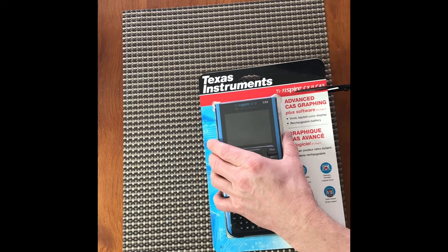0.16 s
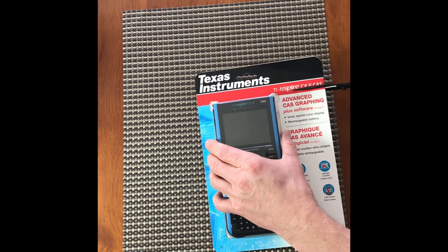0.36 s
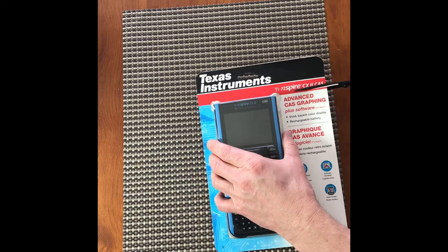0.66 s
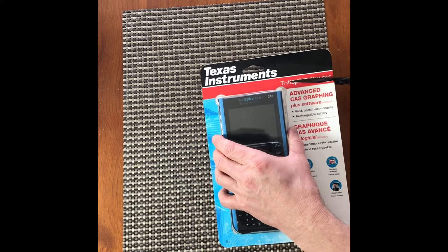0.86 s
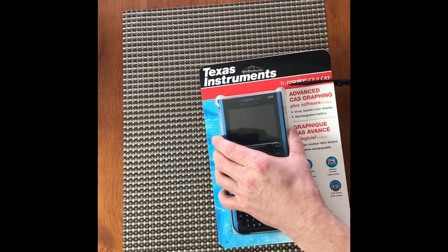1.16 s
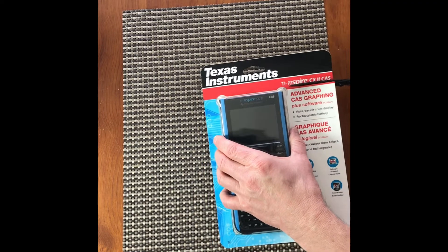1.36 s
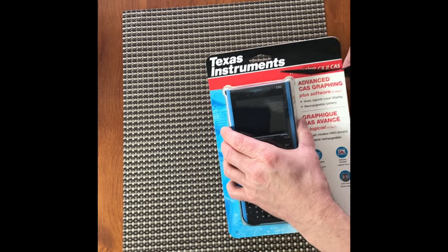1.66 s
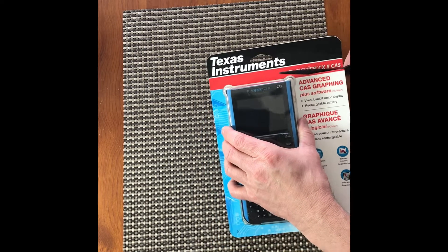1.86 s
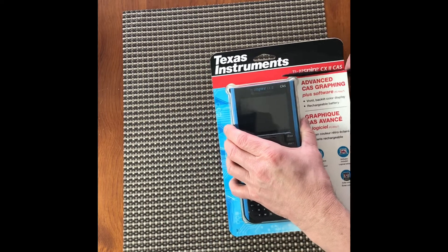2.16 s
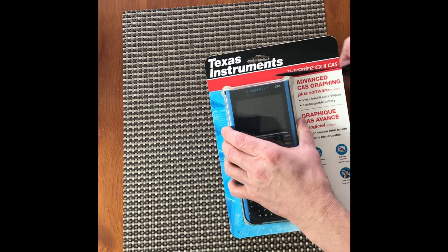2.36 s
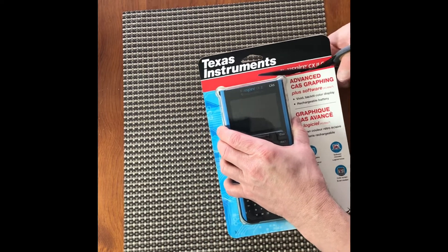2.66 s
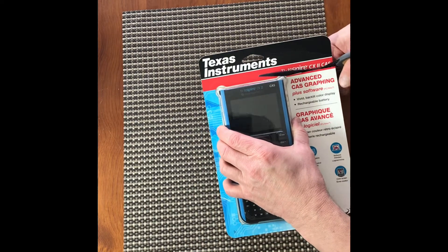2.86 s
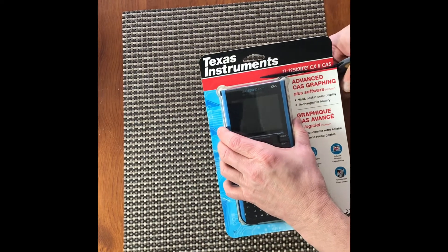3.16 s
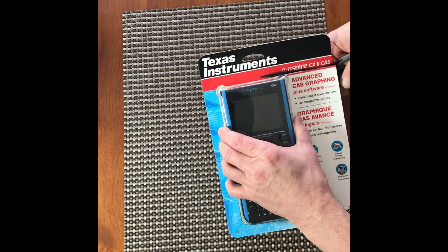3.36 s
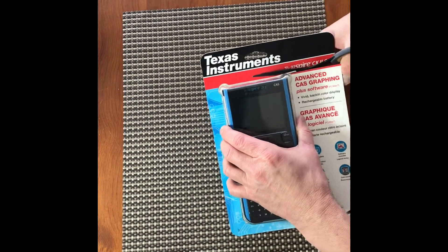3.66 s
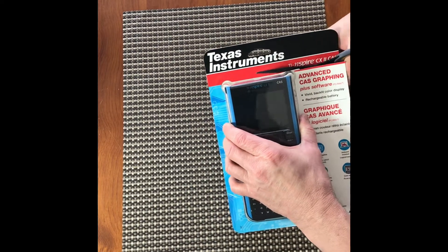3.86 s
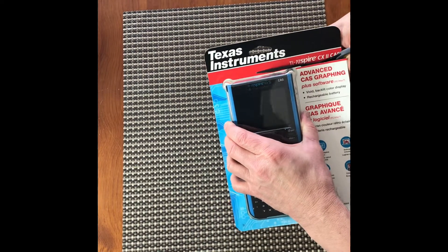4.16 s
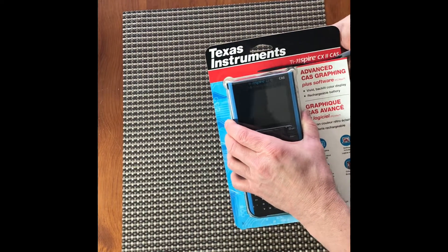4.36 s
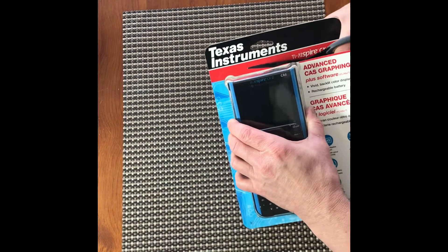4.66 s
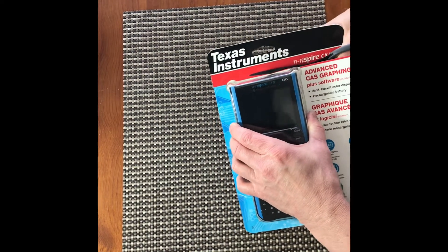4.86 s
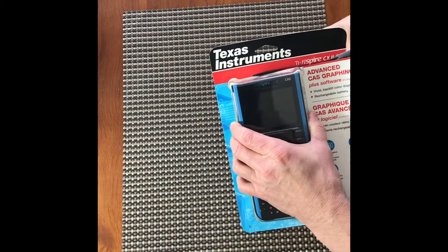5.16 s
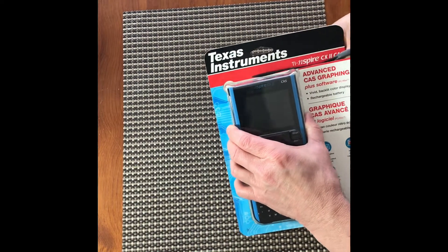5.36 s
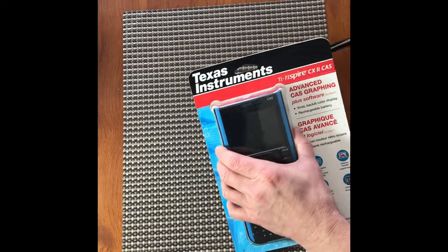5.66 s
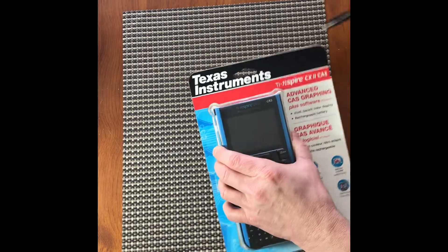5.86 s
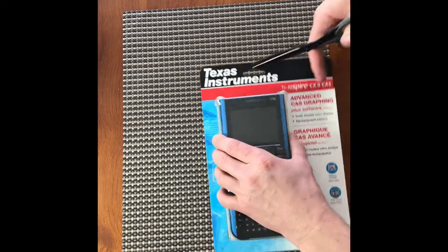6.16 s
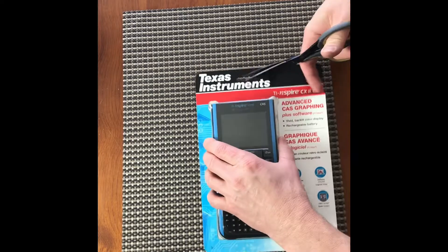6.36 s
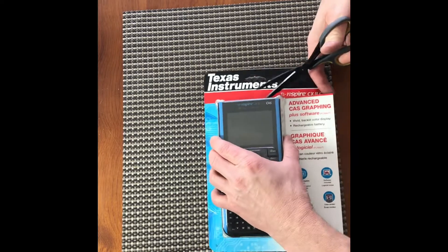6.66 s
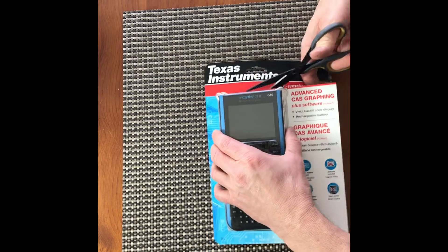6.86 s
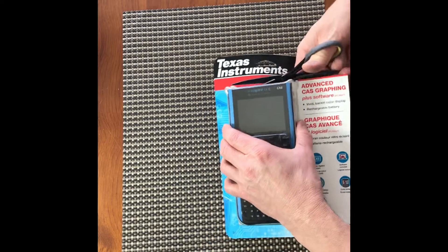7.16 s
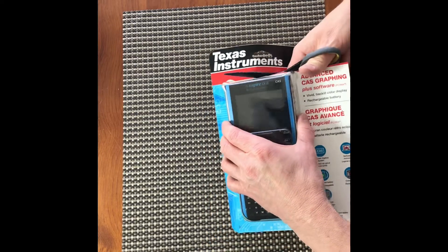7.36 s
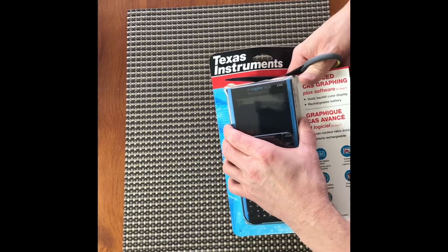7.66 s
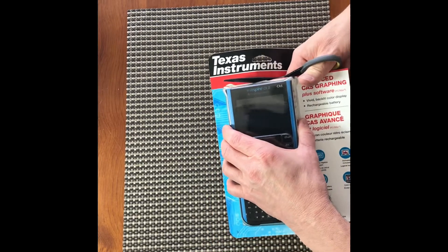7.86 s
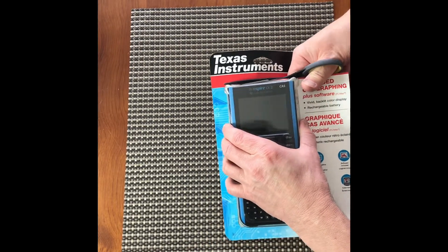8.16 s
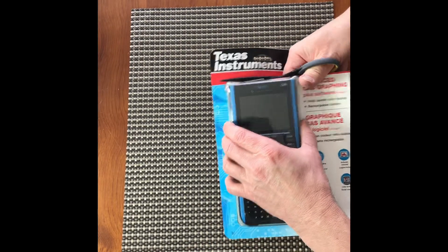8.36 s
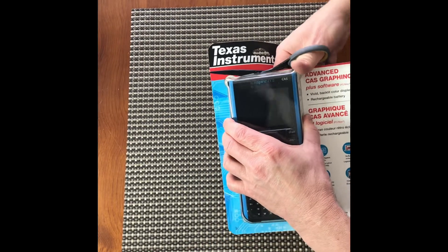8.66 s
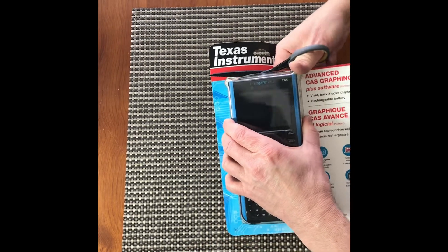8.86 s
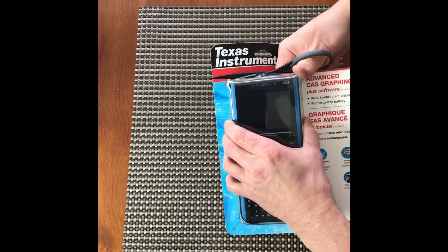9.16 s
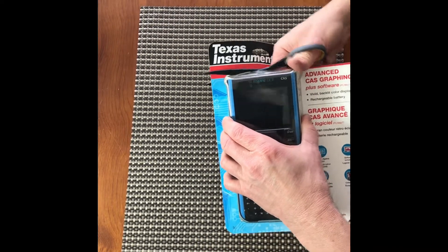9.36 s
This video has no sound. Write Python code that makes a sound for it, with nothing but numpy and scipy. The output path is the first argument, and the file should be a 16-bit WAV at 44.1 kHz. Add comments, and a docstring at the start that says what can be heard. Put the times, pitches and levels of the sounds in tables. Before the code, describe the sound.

Close by in a small room, scissors bite through a stiff plastic shell. Small crisp clicks come in uneven groups, with one hard crack near three seconds and another strong one just before six. Blades softly rub open between bites. Later the snaps crowd together over a faint hand rumble on the table, with short room echo and quiet low air.

```python
"""In a small room, scissors work through a stiff plastic blister pack held down by hand on a table mat.
Fracture: the sheet gives way in snaps, each a crumble of tiny clicks that excites modes of pack and blades.
Stick-slip friction: squeezes grind the blades along the cut; about once a second they rub open again.
Forced vibration: filtered noise with a table resonance gives the dull rumble of the pressing hand.
Decaying noise echoes the cutting, and steady coloured noise is the air of the room."""
import sys
import numpy as np
from scipy import signal
from scipy.fft import rfft, irfft, next_fast_len
from scipy.io import wavfile

SR = 44100
rng = np.random.default_rng(int(sys.argv[2]) if len(sys.argv) > 2 else 0)


def to_wav(sig):
    """Store sig (one row per channel, or 1-D mono) as 16-bit WAV at the path in sys.argv[1].

    Samples outside -1..1 are clipped; the rate is SR.
    """
    pcm = np.clip(np.atleast_2d(sig), -1, 1) * 32767
    pcm = np.round(pcm).astype(np.int16)
    wavfile.write(sys.argv[1], SR, pcm.T)  # frames by channels


N = 418509   # length in samples

# Spectrum of the still room: f/Hz, relative density/dB per Hz
AIR_SPECTRUM = [(15, -48.5), (25, -14), (64, -3.5), (141, -4.5), (293, -7.5), (354, -6), (476, -13.5),
                (734, -10), (1020, -20), (1370, -18.5), (2280, -25.5), (5880, -28), (16000, -38)]
# Snaps of the sheet: t/s, build-up/s, level/dB, shell flex/dB re level, sharpness/dB
SHEET_SNAPS = [(.095, 0.0046, -63.5, -2, -4.5), (.1482, 0.0018, -62.5, 0.5, -11),
               (.244, 0.0019, -48, -9, -18), (.264, 0.0025, -51, -4.5, -11.5),
               (.3914, 0.0029, -51, -5.5, -15.5), (.585, 0.0039, -50.5, -7.5, -14),
               (.824, 0.0019, -65.5, 4, -17), (1.057, 0.0072, -52, -16, -28.5),
               (1.1401, 0.0015, -47.5, -6, -14.5), (1.2311, 0.0017, -61.5, -14, -8),
               (1.2534, .0006, -58.5, -12, -11.5), (1.341, 0.0058, -48, -10, -12),
               (1.606, 0.0031, -53, -2, -13), (1.8771, 0.0061, -60.5, -11, -1),
               (1.9469, 0.0028, -46.5, -4.5, -17.5), (2.0569, 0.0042, -62, -5, -5),
               (2.3401, 0.0036, -59.5, -7, -14), (2.411, 0.0023, -52.5, -4.5, -22),
               (2.7847, .0008, -45.5, -10.5, -8.5), (2.8122, 0.0028, -59.5, 9, -15),
               (3.0034, .0005, -30.5, -2, -18), (3.2365, .002, -56.5, -9, -22),
               (3.5249, 0.0016, -61, -1.5, -22), (3.8145, .0011, -56.5, -7, -19),
               (4.0834, .002, -60, 8, -6.5), (4.1257, 0.00063, -47.5, 3, -18),
               (4.3099, 0.0037, -51, 6.5, -12.5), (4.349, 0.00037, -51.5, -3, -21),
               (4.6852, .0005, -71, 10.5, 5.5), (4.7202, 0.0054, -58, 7.5, -17),
               (4.8618, .003, -56, 6, -11.5), (4.9045, 0.00119, -38.5, 1, -27), (4.949, .0015, -56, -2, -8),
               (4.9691, 0.0022, -52, -18, -17), (5.0673, 0.0024, -44, 0, -22), (5.452, .001, -57, -6, -11),
               (5.4828, 0.0026, -45.5, 2, -27), (5.5579, 0.00096, -47.5, -3, -9.5),
               (5.5777, .0005, -52, 5, -25), (5.6188, .0004, -50.5, -5, -23),
               (5.7017, 0.0016, -44.5, -15, -27), (5.7401, .003, -35, 2.5, -8),
               (5.7878, 0.0014, -50, 5, -5.5), (6.2427, 0.0006, -62.5, 1, -13),
               (6.275, .001, -54.5, -12, -20), (6.3348, .0027, -58.5, 3, -10.5),
               (6.4248, 0.0018, -62, -12, -20), (6.5901, .00075, -56.5, 5.5, -12.5),
               (6.652, 0.00095, -57, -2, -13), (6.746, 0.0034, -51, 2.5, -21), (6.777, 0.0036, -55, 1, -16),
               (6.822, 0.0048, -55, 4.5, -10), (6.8981, .008, -52, 0.5, -17),
               (6.9427, 0.0015, -55.5, 1, -8), (7.1, 0.0055, -55, -1, -14), (7.2501, 0.0022, -52, 8, -3.5),
               (7.258, .0003, -52, 11.5, -32), (7.368, 0.0032, -52, 3, -19),
               (7.641, .0013, -62.5, -2, -16.5), (7.8864, 0.0069, -57.5, 6, -11),
               (8.003, .0017, -47.5, -4, -21), (8.0279, 0.0051, -48.5, 0, -13),
               (8.134, 0.00095, -60.5, 5.5, -31), (8.3529, 0.0016, -46.5, 1, -7),
               (8.3632, 0.00096, -54.5, 7, 6), (8.4796, .0028, -58, 2.5, -8.5),
               (8.9835, .0006, -43.5, 0.5, 3.5), (9.0367, 0.0019, -53.5, 9, -3),
               (9.2992, 0.0032, -57, 10.5, -13), (9.333, 0.0061, -45, 3, -26),
               (9.3805, 0.0019, -42, 0, -18)]
# Resonances of pack and blades: f/Hz, width/Hz, relative level/dB; only those inside a register sound
PACK_MODES = [(141, 38, -18), (215.4, 13.5, -9.5), (260.7, 53, -7.5), (351.6, 46, 3), (416, 74, -1),
              (534.8, 33, 5), (728, 90, 3.5), (794, 57, 4.5), (928, 31, -3), (1180, 120, -2),
              (1410, 130, -2.5), (1435, 790, 8.5), (1826, 130, 1), (2720, 210, -8), (3060, 1200, 3.5),
              (3725, 200, -7.5), (5070, 1500, -7), (5940, 1840, -1.5), (8330, 1100, -8.5),
              (13100, 4600, -10)]
# Registers of the modes, in the order flex, ring, crack, edge, tick, top:
# low f/Hz, high f/Hz, crumble time constant of an instant break/s, gain/dB, share of the sharpness
MODE_REGISTERS = [(119, 535, 0.0045, 1.63, 0.078), (590, 990, 0.003, 0.37, 0),
                  (1127, 1816, 0.0059, 2, 0.51), (2560, 4240, 0.0044, 0.98, .75),
                  (4800, 8100, 0.0055, -1.85, 0.97), (9000, 15100, 0.0046, -10.5, 0.89)]
# Decay of the room: f/Hz, t60/s
REVERBERATION_TIME = [(100, 0.32), (300, 0.53), (800, 0.54), (2000, 0.5), (5000, 0.39), (13000, 0.21)]
# Strength of the echo against the direct sound: f/Hz, level/dB
ECHO_LEVEL = [(100, 2), (350, -2), (800, -4.5), (1600, -3), (3200, -2), (7000, -4.5), (14000, -6.5)]
# Spectrum of the sliding friction: f/Hz, relative density/dB per Hz
FRICTION_SPECTRUM = [(88, -45.5), (150, -15), (222, -9.5), (334, -3.5), (439, -5), (637, -2), (805, -3.5),
                     (1060, -12.5), (1210, -9.5), (1900, -18), (2140, -28), (3220, -25.5), (4240, -28.5),
                     (14800, -46), (16000, -35)]
# Blades rubbing open for the next bite: middle t/s, half length/s, stroke level/dB
OPENING_STROKES = [(.145, .035, -60.5), (.82, 0.19, -63.5), (1.6, .085, -55), (2.4, 0.05, -53.5),
                   (3.44, 0.053, -54.5), (4.49, 0.042, -52.5), (5.45, 0.12, -54.5)]
# Squeezes grinding the blades through the sheet: middle t/s, half length/s, stroke level/dB
SQUEEZE_STROKES = [(0.286, .025, -51), (1.17, .15, -62), (1.904, .06, -56), (2.927, .075, -60),
                   (3.19, .04, -54.5), (3.78, 0.04, -57), (4.168, .07, -53), (4.96, .1, -53),
                   (5.711, .14, -51), (6.765, .03, -53), (6.871, .07, -54), (7.1, .3, -58.5),
                   (7.32, .06, -56.5), (7.658, .07, -59), (8.076, .13, -54), (8.498, .1, -57),
                   (8.913, .05, -56), (9.38, .12, -56)]
# The hand pressing and shifting the pack on the table: middle t/s, half length/s, rumble level/dB
HAND_PRESSES = [(3.638, 0.057, -63), (5.78, .1, -62), (6.39, 0.088, -59), (7.1, .35, -73),
                (8.08, 0.16, -60.5), (8.695, 0.53, -62.5), (9.4, .17, -60.5)]

AIR_DB = -65.5
# the first bites, in the taut rim, are the crispest
FIRST_BITES_S, FIRST_BITES_TOP_DB = 2.3, 6.5
# once the first cut breaks through, the open shell cracks louder
SECOND_CUT_S, SECOND_CUT_CRACK_DB = 5.72, 4
# a hard grip damps the modes under STIFF_HZ: dB per octave for each dB of snap over HARD_SNAP_DB
HARD_SNAP_DB, STIFF_HZ, STIFF_DB_PER_OCT = -47, 350, 1.1
# hiss before the stroke level is applied; bare steel is the brighter
SQUEEZE_HISS_DB, OPENING_HISS_DB = -9, -4.5
# crumbs: mean level against the squeeze, full range of levels, mean build-up
CRUMB_DB, CRUMB_SPREAD_DB, CRUMB_BUILD_S = -8, 2, .0015
CRUMB_FLEX_DB, CRUMB_SHARP_DB = -4.5, -17   # colour of the crumbs, as in SHEET_SNAPS
CUTOFF_HZ = 15800


def from_db(db):
    """Logarithmic levels: decibels to amplitude gain."""
    return 10 ** (np.asarray(db) / 20)


def rms_one(x):
    """Mean power: scale a signal to unit rms."""
    return x / np.sqrt(np.mean(x ** 2) + 1e-20)


def at_hz(points, hz):
    """Interpolation of a spectrum on a logarithmic frequency axis."""
    f, value = np.transpose(points)
    return np.interp(np.log(np.maximum(hz, 1)), np.log(f), value)


def band(x, low_hz, high_hz):
    """Band limitation by a Butterworth band-pass."""
    sos = signal.butter(2, [low_hz, high_hz], "band", fs=SR, output="sos")
    return signal.sosfilt(sos, x)


def colour(x, spectrum):
    """Spectral shaping: multiply the Fourier transform by a smooth gain."""
    size = next_fast_len(N)
    gain = from_db(at_hz(spectrum, np.fft.rfftfreq(size, 1 / SR)))
    return irfft(rfft(x, size) * gain, size)[:N]


def resonate(x, hz, width_hz):
    """Damped oscillator: a two-pole resonance with gain 1 at its peak."""
    r = np.exp(-np.pi * width_hz / SR)
    numerator = np.array([1, 0, -1]) * (1 - r * r) / 2
    denominator = [1, -2 * r * np.cos(2 * np.pi * hz / SR), r * r]
    return signal.lfilter(numerator, denominator, x + 1e-18)


def grains(shape, per_s, spread_db):
    """Shot noise: random tiny clicks of either sign and uneven size."""
    chance, size, sign = np.moveaxis(rng.random(shape + (3,)), -1, 0)
    height = from_db(-spread_db * np.log(np.maximum(size, .01)))
    return (chance < per_s / SR) * height * np.sign(sign - .5)


def swells(middle, half_length, level_db, edge_db=-11.0, roundness=1.7):
    """Amplitude envelope: smooth strokes, each edge_db down half a length before and after its middle."""
    t = np.arange(0, N, 32)[:, None] / SR
    stroke_db = level_db + edge_db * np.abs((t - middle) / half_length) ** roundness
    gain = from_db(stroke_db).sum(axis=1)
    return np.interp(np.arange(N) / SR, t[:, 0], gain)


def room_air():
    """Stationary noise: the still room as white noise with a fixed spectrum."""
    return from_db(AIR_DB) * rms_one(colour(rng.standard_normal(N), AIR_SPECTRUM))


def snaps(rows, first_crack=7.2, sudden_s=0.0017, linger=0.25, mode_spread_db=2.0, level_span_s=0.018,
          lead_s=0.001003, sheet_db=-21.5, strain_db=-12.0, strain_s=0.0042):
    """Brittle fracture: strain builds up and breaks; the crumble dies in milliseconds as the modes ring."""
    start, build, level_db, flex_db, sharp_db = np.transpose(rows)
    crack_db = SECOND_CUT_CRACK_DB * (start > SECOND_CUT_S)
    top_db = FIRST_BITES_TOP_DB * (start < FIRST_BITES_S)
    shell_dbs = (flex_db, 0, crack_db, crack_db / 2, 0, top_db)   # one for each register
    stiff_db = STIFF_DB_PER_OCT * np.maximum(level_db - HARD_SNAP_DB, 0)[:, None]

    before = SR // 50
    t = np.arange(-before, SR // 10) / SR
    build = build[:, None]
    crumble = rms_one(grains((len(start), len(t)), per_s=9000, spread_db=3.0))
    slowness = build / (build + sudden_s)   # a slow tear gives more warning
    strain = from_db(strain_db) * np.exp(-np.abs(t) / strain_s) * slowness
    # the force comes just before the pack speaks
    first = np.round((start - lead_s) * SR).astype(int) - before
    snap_number = np.arange(len(start))
    break_at = before + (build[:, 0] * SR).astype(int)
    out = np.zeros(N + len(t))

    for (low, high, fade_s, gain_db, share), shell_db in zip(MODE_REGISTERS, shell_dbs):
        # a slow tear also ends slowly
        dying = np.exp(-np.maximum(t - build, 0) / (fade_s + linger * build))
        force = crumble * (strain + np.clip(t / build, 0, 1) * dying)
        # the break itself, hardest when it comes suddenly
        force[snap_number, break_at] += first_crack / (1 + build[:, 0] / sudden_s)
        rung = 0
        for hz, width, db in PACK_MODES:
            if low <= hz < high:
                # the cut moves along the sheet, so every snap favours other modes
                favour_db = mode_spread_db * rng.standard_normal((len(start), 1))
                grip_db = stiff_db * min(np.log2(hz / STIFF_HZ), 0)
                rung = rung + from_db(db + grip_db + favour_db) * resonate(force, hz, width)
        # the flat sheet also radiates the force as it is
        rung = band(rung + from_db(sheet_db) * force, low, high)
        rung /= np.sqrt(np.sum(rung ** 2, axis=1, keepdims=True) / (level_span_s * SR))
        # a sharper break reaches higher registers
        gain = from_db(level_db + share * sharp_db + shell_db + gain_db)
        for i, sound in zip(first, rung * gain[:, None]):
            out[i:i + len(t)] += sound
    return out[:N]


def echo_tail(first_wall_s=0.005, build_s=0.0024):
    """Reverberation: wall echoes thicken into a tail whose decay time depends on frequency."""
    t = np.arange(SR * 3 // 4) / SR
    edges = np.geomspace(70, 17000, 15)
    white = rng.standard_normal((2, len(t)))
    tail = 0
    onset = np.clip((t - first_wall_s) / build_s, 0, 1)
    for k, (low, high) in enumerate(zip(edges, edges[1:])):
        hz = np.sqrt(low * high)
        decay = np.exp(-np.log(1000) * t / at_hz(REVERBERATION_TIME, hz))
        echoes = band(white[k % 2], low, high) * onset * decay   # neighbouring bands use separate noises
        bandwidth_gain = np.sqrt(2 * (high - low) / SR / np.sum(echoes ** 2))
        tail = tail + from_db(at_hz(ECHO_LEVEL, hz)) * echoes * bandwidth_gain
    return tail


def room(x, count=6, weights_per_s=30):
    """Diffuse echo: random weights at constant power spread the sound over noise tails, for smoothness."""
    knots = rng.standard_normal((count, N // 100))
    position = np.arange(N) / SR * weights_per_s
    share = np.array([np.interp(position, np.arange(len(row)), row) for row in knots])
    share /= np.sqrt(np.sum(share ** 2, axis=0))
    return sum(signal.fftconvolve(x * part, echo_tail())[:N] for part in share)


def slides(strokes, body_db, hiss_db, slips_per_s, catch_db, split_hz=2200, catches_per_s=130):
    """Stick-slip friction: steel catches on the cut edge; coarse slips shake the pack, fine ones hiss."""
    knots = rng.standard_normal(N // 100)
    catch = np.interp(np.arange(N) / SR * catches_per_s, np.arange(len(knots)), knots)
    grip = from_db(catch_db * catch)
    coarse_slips = grip * grains((N,), per_s=slips_per_s, spread_db=4.0)
    fine_slips = grip * grains((N,), per_s=2600, spread_db=3.0)
    coarse = band(colour(coarse_slips, FRICTION_SPECTRUM), 120, split_hz)
    fine = band(colour(fine_slips, FRICTION_SPECTRUM), split_hz, 15000)
    friction = from_db(body_db) * rms_one(coarse) + from_db(hiss_db) * rms_one(fine)
    return friction * swells(*np.transpose(strokes))


def crumbs(count=16):
    """Random fracture: small snaps, most where the squeeze is hardest; columns as in SHEET_SNAPS."""
    effort = swells(*np.transpose(SQUEEZE_STROKES))
    when, size, speed = rng.random((count, 3)).T
    # one crumb at random in each equal portion of the effort
    portion = (np.arange(count) + when) / count
    at = np.searchsorted(np.cumsum(effort) / np.sum(effort), portion).clip(0, N - 1)
    build = CRUMB_BUILD_S * (.5 + speed)
    level_db = 20 * np.log10(effort[at]) + CRUMB_DB + CRUMB_SPREAD_DB * (size - .5)
    crumb_colour = np.full((count, 2), [CRUMB_FLEX_DB, CRUMB_SHARP_DB])
    return np.c_[at / SR, build, level_db, crumb_colour]


def handling(table_hz=80, table_width_hz=14, table_db=3):
    """Forced vibration: the pressing hand makes the table rumble, strongest at the resonance of its top."""
    rumble = band(band(rng.standard_normal(N), 38, 270), 34, 450)
    rumble = rumble + from_db(table_db) * resonate(rumble, table_hz, table_width_hz)
    return rms_one(rumble) * swells(*np.transpose(HAND_PRESSES))


def scene():
    """Superposition: cutting close by, its echo, the pressing hand and the quiet room."""
    air = room_air()
    snapping = snaps(np.vstack([SHEET_SNAPS, crumbs()]))
    opening = slides(OPENING_STROKES, body_db=-1.0, hiss_db=OPENING_HISS_DB, slips_per_s=330, catch_db=3.8)
    squeezing = slides(SQUEEZE_STROKES, body_db=-1.5, hiss_db=SQUEEZE_HISS_DB, slips_per_s=260, catch_db=4.0)
    cutting = snapping + squeezing + opening
    return (cutting + room(cutting) + handling() + air)[None]


def record(dry):
    """Band limits: a high-pass removes the deep bass, a steep low-pass ends the sound at CUTOFF_HZ."""
    thin = signal.sosfilt(signal.butter(4, 34, "high", fs=SR, output="sos"), dry)
    return signal.sosfilt(signal.ellip(12, .1, 80, CUTOFF_HZ, fs=SR, output="sos"), thin)


dry = scene()
out = record(dry)
to_wav(out)
```